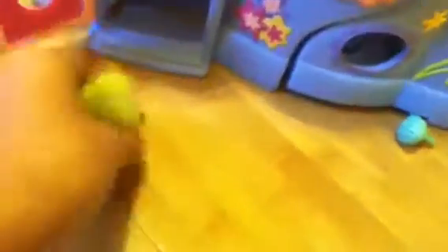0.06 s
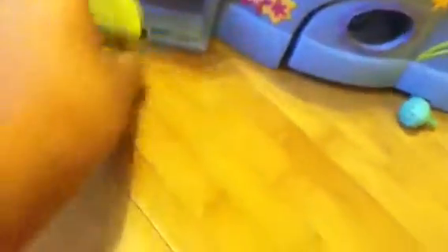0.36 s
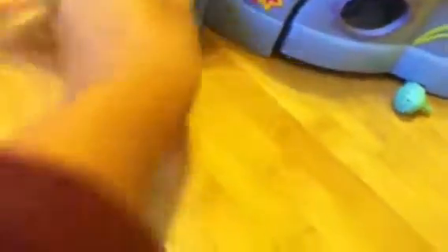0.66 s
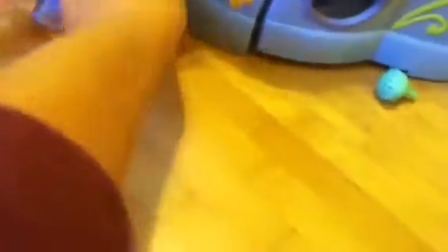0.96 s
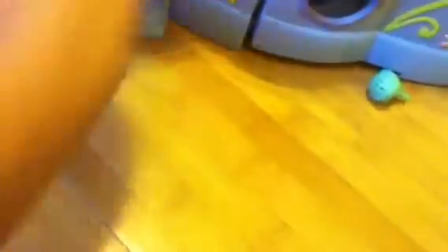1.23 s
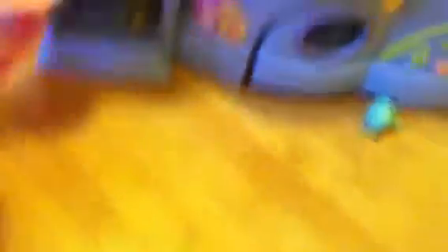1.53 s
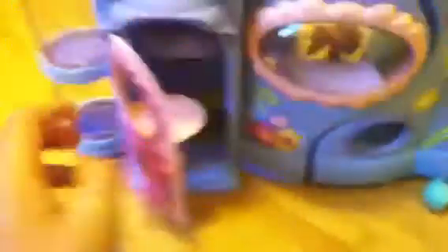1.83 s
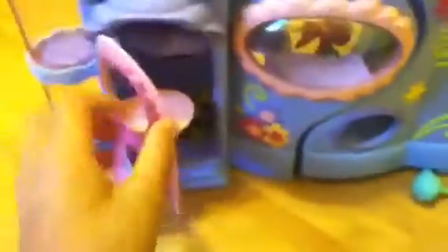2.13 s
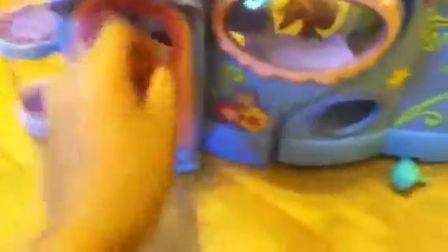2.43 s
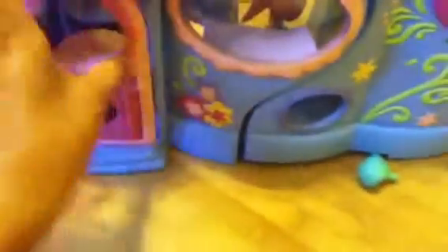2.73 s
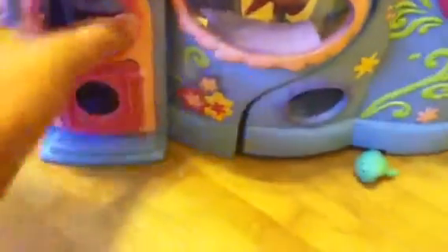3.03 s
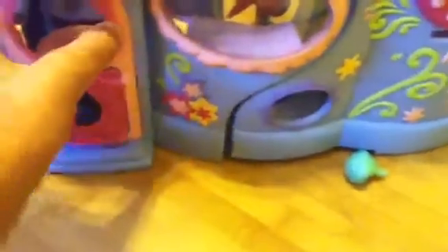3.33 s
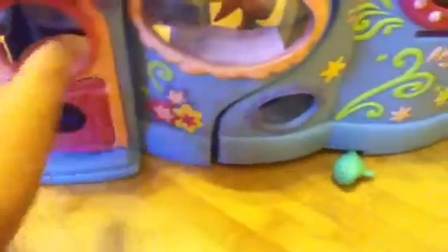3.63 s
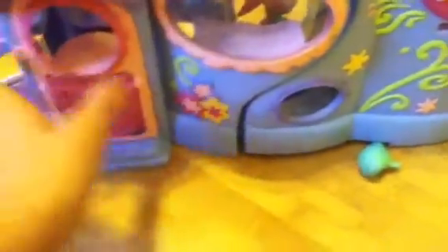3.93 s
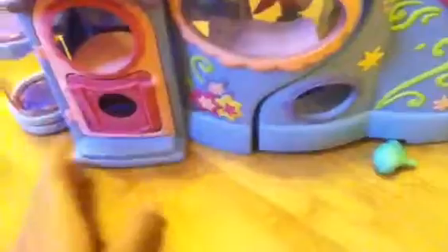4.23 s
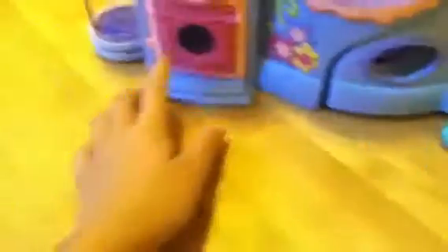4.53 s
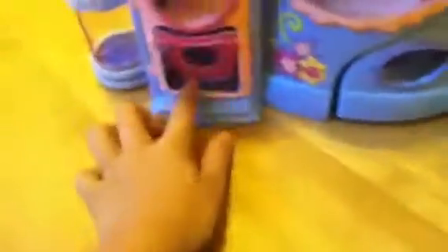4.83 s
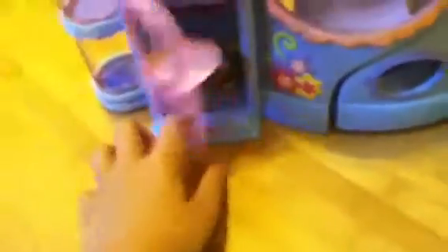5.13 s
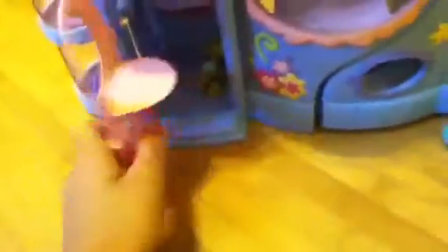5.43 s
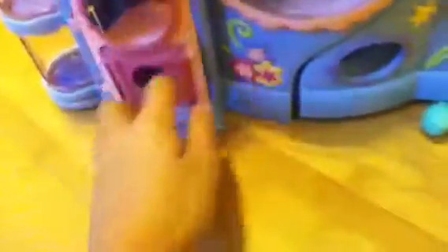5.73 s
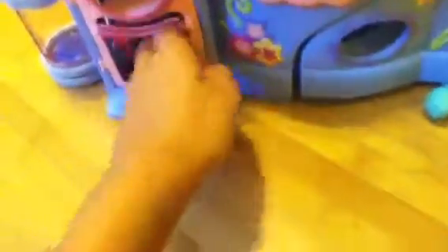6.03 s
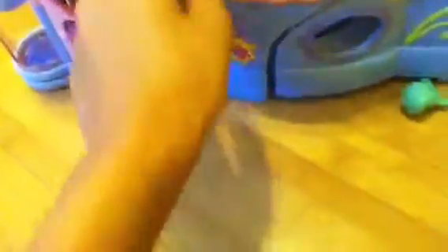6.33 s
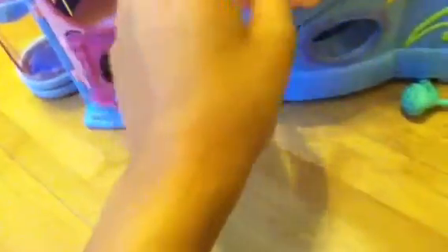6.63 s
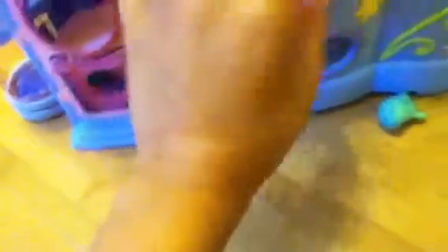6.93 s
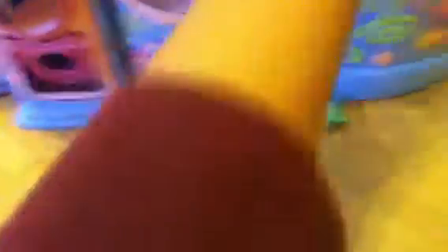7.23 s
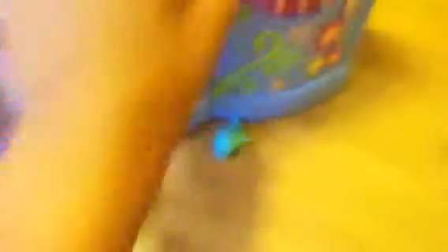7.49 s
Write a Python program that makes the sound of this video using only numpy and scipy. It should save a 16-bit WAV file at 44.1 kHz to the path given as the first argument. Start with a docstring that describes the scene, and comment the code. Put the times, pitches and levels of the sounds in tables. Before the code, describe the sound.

A toy figure is stamped twice on a hardwood floor with short, hollow knocks, then clatters into a plastic playhouse. A little door and flap are pushed open and shut in uneven bursts of clicks, clacks and light scrapes, with a sharp tick from the catch. Finally the toy is shoved with a brief squeak as a sleeve brushes past the microphone. The small room has a faint hiss and hum.

```python
"""Two hollow knocks come first: a child stamps a toy figure on a hardwood floor in a small room.
The figure clatters into a plastic playhouse, then a little door and its flap are pushed open and shut.
Each hit makes the hollow shell ring, and the door's catch ticks. Between hits, sliding plastic sticks
and slips, so it scrapes and hisses. At the end the toy is shoved aside with a squeak and a sleeve
brushes past the microphone. A faint hiss and hum lie under it all."""
import sys
import numpy as np
from scipy import signal
from scipy.fft import rfft, irfft, next_fast_len
from scipy.io import wavfile
from scipy.ndimage import uniform_filter1d

SR = 44100
rng = np.random.default_rng(int(sys.argv[2]) if len(sys.argv) > 2 else 0)


def persist_wave(psi):
    """Save psi, clipped to +-1, as 16-bit WAV."""
    counts = np.round(np.clip(psi, -1, 1) * 32767).astype(np.int16)
    wavfile.write(sys.argv[1], SR, np.atleast_2d(counts).T)


N = 333396

# the figure hits the floor: (time [s], level [dB], crack against the ringing [dB])
STAMPS = [(0.1236, -14.5, -9), (0.3831, -16, -1.5)]
# the notes that figure and floorboard ring at: (pitch [Hz], level [dB], time to fade by 60 dB [s])
BOARD_NOTES = [(283, 0.5, 0.03), (360, 0, 0.028), (615, 7.5, 0.017), (1180, -14.5, 0.011),
               (1460, -30, 0.012), (3820, -15, 0.021), (5170, -13.5, 0.018), (7500, -20, 0.0077)]
# tone colour of the crack of its feet: (frequency [Hz], level [dB])
CRACK_COLOUR = [(150, -13), (300, 0), (700, -0.5), (1550, 10), (2200, -7), (2900, -2.5), (4000, -4),
                (6500, -18), (9000, -18), (16000, -37.5)]

# figure, door, flap and hand hit the playhouse; chatter is how long the parts keep bouncing:
# (time [s], chatter [s], relative strength [dB], brightness [dB per octave], extra thud [dB])
CLACKS = [ (.296, .019, -41.5, -.5, 0.5), (.533, 0.0039, -43.5, 2.5, 2.5), (.606, 0.01, -45.5, -.5, 1),
          (.629, 0.0021, -46, -1, 0), (.669, .002, -41.5, -1, 3.5), (.753, .004, -27.5, -5.5, -5),
          (.87, 0.0012, -28.5, -3, -11.5), (.916, 0.0055, -22, -2.5, -17), (.9875, 0.0033, -19, 1, -7),
          (1.05, .002, -30, -1, -17), (1.112, .002, -25.5, -1, -4.5), (1.129, 0.0022, -20.5, 0.63, -4.5),
          (1.146, 0.0064, -25.5, -2.5, -20), (1.335, 0.006, -29, -0.2, -5),
          (1.361, 0.0056, -28, -1.5, -5.5), (1.405, 0.0016, -40, 0, -12), (1.454, 0.006, -40, -2, 1),
          (1.494, 0.011, -41.5, -4.3, 1), (1.649, 0.0069, -50.5, -4, -2), (1.992, 0.014, -50, -4.5, -1.5),
          (2.184, 0.01, -60, -12, 3), (2.432, 0.0098, -48.5, -0.5, 4), (2.45, .002, -37, -1.5, -2),
          (2.482, .0033, -20.5, 0.96, -6.5), (2.582, .0035, -44, 1.5, 0), (2.602, .002, -38, -10, -1),
          (2.615, 0.0048, -29, 2.5, -5.5), (2.67, 0.03, -39, 0.5, -14), (2.711, .003, -39.5, 3, -3),
          (2.716, 0.009, -24, -6, -0.5), (2.738, 0.0067, -31.5, -2.3, -4), (2.757, 0.0048, -38, -1, -1),
          (2.811, .008, -46, -14, 13.5), (2.864, 0.00374, -28, -1, -14), (2.931, .003, -45, 0, -1),
          (3.013, 0.0067, -30, 4.5, -2), (3.068, 0.0059, -41.5, -14, -4.5), (3.255, 0.0041, -63, 1.5, 6),
          (3.6, .003, -59.5, 1.5, 2), (4.145, 0.0081, -66, -3, 10), (4.43, 0.056, -62, -12, 5.5),
          (4.727, 0.0078, -36, 2, -2.5), (4.884, 0.0067, -44.5, -2.7, -3.5), (4.951, .0036, -50, 4, -8),
          (5.069, 0.0033, -27, 1.5, -4.5), (5.103, 0.00878, -32, 2, -3), (5.127, 0.0124, -30, 1, -7),
          (5.153, .002, -44, 3.5, 7), (5.171, 0.017, -43, 3, 3), (5.19, .008, -37.5, -1.5, -5),
          (5.26, .012, -41, 3, 3), (5.276, 0.0027, -24.5, -2, -11), (5.285, .003, -34, 5, 3.5),
          (5.429, 0.0023, -36.5, -2.1, -5), (5.468, 0.0044, -44.5, -1.2, 6), (5.571, 0.0044, -39, -0.3, -3),
          (5.587, 0.0064, -37, -3, 4), (5.686, 0.01, -39, -0.3, 4), (5.752, 0.0091, -46, -1, -9),
          (5.834, 0.009, -22.5, -0.5, -12.5), (5.873, 0.00505, -30.5, 0, -2),
          (5.908, 0.0022, -30.5, -1.5, -16), (5.926, 0.013, -23, -12, -8.5), (5.937, 0.0025, -27.5, 6, 0.5),
          (6.008, .006, -42, -.4, 4.5), (6.041, 0.0027, -43, 0.5, -13), (6.203, 0.0042, -43, 0, -3.5),
          (6.331, 0.0085, -39.5, 2.5, 3), (6.401, 0.00263, -45.5, 1.7, -6), (6.513, 0.011, -50.5, -.7, 1),
          (6.64, 0.0022, -58.5, 5.5, 2), (6.671, 0.012, -52, -1, 3), (6.856, 0.0044, -47.5, -2.5, -9),
          (6.947, .0036, -44.5, -0.5, 2), (7.152, 0.0015, -42.5, -7, -13), (7.355, .001, -36, 1.5, 3.5),
          (7.368, 0.018, -30.5, -2, -4), (7.389, .011, -34.5, 0, 0.5), (7.414, 0.0092, -32, -1.2, -23),
          (7.473, 0.0062, -38, 1.5, -4), (7.489, 0.0029, -37, 3.5, 6.5), (7.533, .0017, -27.5, -3.5, -4.5)]
# five bands of a hit, called thud, knock, clack, tick and sparkle: (low edge [Hz], high edge [Hz])
BANDS = [(195, 600), (600, 1700), (1700, 5000), (5000, 9500), (9500, 16000)]
# the notes that the hollow shell rings at: (pitch [Hz], width [Hz], level [dB])
SHELL_NOTES = [(268, 160, -11), (390.2, 14, -4.5), (471.3, 21, 0), (691, 75, -2.5), (975.5, 39, -3),
               (1183.4, 27, -3), (1266, 16, -7.5), (1714, 270, -6.5), (2120, 48, -3.5), (2675, 200, -14.5),
               (2816, 110, -4), (3730, 120, -15), (4200, 120, -31), (5690, 190, -20), (5970, 252, -7.5),
               (7090, 680, -5.5), (10750, 780, -14.5)]
# tone colour of the shell's many weaker notes: (frequency [Hz], level [dB])
PLASTIC_COLOUR = [(50, -50), (100, 10), (180, 1.5), (260, 1.5), (650, -1), (1200, -2.5), (1700, -11.5),
                  (2200, -6), (4000, -11.5), (7000, -17), (11500, -23), (12800, -24.5), (16000, -37.5)]
# the door's catch springs over its lip: (time [s], level [dB])
CATCHES = [(2.484, -31), (5.9372, -16.5)]
# tone colour of the stiff little catch: (frequency [Hz], level [dB])
CATCH_COLOUR = [(5000, -25), (9000, -11), (10500, 2), (11500, 3), (12800, -12), (16000, -14)]

# plastic slides on plastic: (start [s], length [s], relative level [dB])
SLIDES = [(0.341, 0.098, -38.5), (.78, .1, -52), (1.005, .2, -42.5), (1.36, 0.096, -40.5),
          (1.8, 0.064, -51.5), (2.28, .14, -51), (2.42, 0.3, -47), (2.629, 0.26, -39), (2.981, .07, -38),
          (3.45, 0.32, -64), (4.87, .21, -48.5), (5.11, .12, -37.5), (5.44, 0.071, -38),
          (5.6, 0.095, -39.5), (5.861, .18, -38), (6.3, 0.048, -36.5), (6.39, 0.16, -52),
          (6.85, 0.15, -49.5), (7.36, 0.043, -25), (7.46, 0.09, -32)]
# the toy's rim squeaks on the floor: (time [s], slip rate [Hz], level [dB])
SKID = [(7.36, 674, -56), (7.372, 709, -54), (7.405, 815, -25), (7.425, 960, -46), (7.44, 1000, -66)]
# smooth plastic rubs, as in the door's hinge: (start [s], length [s], level [dB])
RUBS = [(4.945, .17, -46), (6.865, 0.04, -53.5)]
# the thin notes that this rubbing wakes: (pitch [Hz], width [Hz], level [dB])
SQUEAK_NOTES = [(2860, 450, 0), (4240, 430, -5), (5470, 500, 1), (6000, 530, -8), (7700, 260, 3),
                (9540, 140, -0.5), (10100, 490, -6), (11400, 1200, -12.5)]
# a finger drags over the toy's wall: (start [s], length [s], level [dB])
FINGER_DRAGS = [(6.38, 0.25, -60.5), (6.68, 0.083, -65)]
# that wall's notes under the finger: (pitch [Hz], width [Hz], level [dB])
WALL_NOTES = [(2300, 570, -1), (5160, 400, -5), (6270, 450, -7), (7690, 700, -8)]
# skin and cloth brush by: (start [s], length [s], level [dB])
BRUSHES = [(0, 0.054, -54.5), (.78, 0.16, -56), (6.82, 0.19, -54.5), (7.11, 0.47, -45)]
# tone colour of the brushing: (frequency [Hz], level [dB])
CLOTH_COLOUR = [(120, -46), (200, -21), (322, -12), (394, -14), (456, -8), (590, -5), (950, -4), (1940, -7),
                (7270, -6), (16000, -18.5)]

# tone colour of still air and microphone hiss: (frequency [Hz], level [dB])
HISS_COLOUR = [(12, -54), (20, -23.5), (44, -15), (123, -3), (216, -7.5), (328, -7), (377, -12.5),
               (542, -13), (849, -17), (976, -20.5), (1090, -18.5), (1190, -21), (3340, -22), (16000, -27)]
# mains hum: (pitch [Hz], level [dB])
HUM = [(59.5, -75), (119, -69.5)]
# how long the room echoes: (frequency [Hz], time to fade by 60 dB [s])
ECHO_TIMES = [(150, 0.18), (500, 0.33), (2000, 0.39), (6000, 0.44), (10000, 0.24), (16000, 0.37)]
# tone colour of what the room's walls give back: (frequency [Hz], level [dB])
ECHO_COLOUR = [(150, 11), (600, 6), (2500, -1), (7000, -2.5), (15000, 2.5)]

GRAZE_S = .005  # how long the parts graze just before a hit
HIT_S = .016  # a hit's level is set over this first stretch
BAND_FILTERS = [signal.butter(4, edges, "bandpass", fs=SR, output="sos") for edges in BANDS]


def figure_stamps(bass_hz=265, beam_hz=1500, echo_db=-14.5):
    """The figure's feet hit the board and both ring: a short, hollow knock with a hard edge."""
    out, t = np.zeros(N), np.arange(SR // 8) / SR
    hz, db, t60 = np.transpose(BOARD_NOTES)[:, :, None]
    sign = (-1) ** np.arange(len(BOARD_NOTES))[:, None]  # neighbouring notes swing opposite ways
    notes = sign * amp(db) * np.sin(2 * np.pi * hz * t) * fade(t, t60)
    # high notes travel in narrow beams, so the room gets mostly low notes and a plain crack
    spread_notes = notes / (1 + (hz / beam_hz) ** 2)
    bass_cut = signal.butter(5, bass_hz, "highpass", fs=SR, output="sos")  # too small to make bass
    crack = lambda: coloured(rng.standard_normal(len(t)), CRACK_COLOUR) * fade(t, 0.028)
    for s, level_db, crack_db in STAMPS:
        direct = signal.sosfilt(bass_cut, notes.sum(axis=0) + amp(crack_db) * crack())
        around = signal.sosfilt(bass_cut, spread_notes.sum(axis=0) + crack())
        gain = amp(level_db) / rms(direct[t < HIT_S])
        add(out, s, gain * direct)
        add(out, s, gain * amp(echo_db) * signal.fftconvolve(around, room_echo()))
    return out


def clatter(spots=9, gain_db=-2):
    """Figure, door and flap strike the playhouse, at spots that each have their own echo."""
    out = np.zeros(N)
    echoes = [room_echo() for _ in range(spots)]
    for k, (s, chatter_s, *hit) in enumerate(CLACKS + rattles()):
        sound = amp(gain_db) * clack(chatter_s, band_levels(*hit))
        add(out, s - GRAZE_S, in_room(sound, echoes[k % spots], echo_db=-12))
    return out


def clack(chatter_s, levels_db, ring_db=-8, scatter_db=4, graze_db=-9, grit_db=3.5,
          snaps_db=(1, 2, 4, 7, 9), fades_s=(.075, .06, .042, .032, .028)):
    """One hit: a graze, a snap, a moment of chatter, then the shell rings, longest in its low bands."""
    t = np.arange(SR // 10) / SR - GRAZE_S
    since_rest = np.maximum(t - chatter_s, 0)
    hz, width, db = np.transpose(SHELL_NOTES)[:, :, None]
    # each spot on the shell favours other notes, and the holding hand shifts them a little
    strength, detune, phase = rng.uniform(-0.97, 1, (3, len(SHELL_NOTES), 1))
    waves = np.sin(2 * np.pi * (hz * (1 + 0.032 * detune) * t + phase))
    gains = amp(db + ring_db + scatter_db * strength)
    ring = np.sum(gains * waves * np.exp(-np.pi * width * since_rest), axis=0)
    # the chatter is a run of tiny, uneven touches
    grit = amp(grit_db * wobble(len(t), smooth_samples=50) * fade(since_rest, 0.2))
    weak_notes = grit * coloured(rng.standard_normal(len(t)), PLASTIC_COLOUR)
    # a clean hit starts with a snap; a long chatter softens it
    snap = fade(np.abs(t), 0.0025) * fade(chatter_s, 0.071)
    during_hit = (t >= 0) & (t < HIT_S)
    out = np.zeros(len(t))
    for band, level_db, snap_db, t60 in zip(BAND_FILTERS, levels_db, snaps_db, fades_s):
        attack = np.where(t < 0, amp(graze_db) * (1 + t / GRAZE_S), 1 + amp(snap_db) * snap)
        part = signal.sosfilt(band, attack * (ring + weak_notes * fade(since_rest, t60)))
        out += amp(level_db) * part / rms(part[during_hit])
    return out


def band_levels(db, brightness, thud_db, clack_db=-2, tick_db=-10, sparkle_db=-9, firm_db=-30.5):
    """A hit's five band levels in dB: hard hits have more treble, heavy ones shake the whole toy."""
    centres = np.sqrt(np.prod(BANDS[1:4], axis=1))
    octaves = np.log2(centres / centres[0])
    knock, middle, tick = db + np.array([0, clack_db, tick_db]) + brightness * octaves
    # firm hits sparkle more, and so do hits with little thud
    sparkle = tick + sparkle_db + .15 * (db - firm_db) - 0.16 * thud_db
    return [db + thud_db, knock, middle, tick, sparkle]


def rattles(per_s=16, offset_db=-6.5, scatter_db=1.5, chatter_s=.006, thud_db=1):
    """Loose parts tap at uneven moments of each slide. Gives rows like those of CLACKS."""
    rows = []
    for start, length, db in SLIDES:
        count = round(length * per_s)
        for k, (shift, strength, brightness) in enumerate(rng.uniform(-1, 1, (count, 3))):
            s = start + length * (k + (1 + shift) / 2) / count
            rows.append((s, chatter_s, db + offset_db + scatter_db * strength, brightness, thud_db))
    return [row for row in rows if row[0] < N / SR]


def door_catch(fade_s=0.032):
    """The stiff catch springs free with a brief, glassy tick."""
    out, t = np.zeros(N), np.arange(SR // 10) / SR
    for s, db in CATCHES:
        tick = coloured(rng.standard_normal(len(t)), CATCH_COLOUR) * fade(t, fade_s)
        add(out, s, in_room(amp(db) * tick, room_echo(), echo_db=-13))
    return out


def scraping(gain_db=-3.5, shell_db=6, soft_hz=6000, bass_hz=190):
    """Sliding parts stick and slip, shaking the shell more softly than a hit does."""
    def colour(hz):
        shell = amp(curve(PLASTIC_COLOUR, hz)) * (1 + amp(shell_db) * resonances(SHELL_NOTES, hz))
        softened = shell / np.hypot(1, hz / soft_hz)
        return softened / np.hypot(1, (bass_hz / (hz + 1)) ** 2)  # a light shell has no deep bass

    rasp = friction(colour, slips_per_s=330, scatter_db=4.5, fade_s=0.034)
    movement = strokes(SLIDES, rise_s=0.09, fall_s=0.056)
    return in_room(amp(gain_db) * movement * rasp, room_echo(), echo_db=-5)[:N]


def rim_skid(jitter=0.028, overtone_db=-10):
    """The rim sticks and slips ever faster as the toy gathers speed: a rising squeak."""
    t = np.arange(N) / SR
    s, hz, db = np.transpose(SKID)
    pitch = np.interp(t, s, hz) * (1 + jitter * wobble(N, smooth_samples=120))
    phase = 2 * np.pi * np.cumsum(pitch) / SR
    tone = unit(sum(amp(overtone_db * k) * np.sin((k + 1) * phase) for k in range(3)))
    loudness = amp(np.interp(t, s, db, left=-120, right=-120))
    return in_room(loudness * tone, room_echo(), echo_db=-9.5)[:N]


def rubbing():
    """Smooth plastic rubs with a faintly squeaky hiss; a finger on the wall is lower and grittier."""
    squeak = friction(lambda hz: resonances(SQUEAK_NOTES, hz),
                      slips_per_s=2800, scatter_db=6.5, fade_s=0.025)
    grit = friction(lambda hz: resonances(WALL_NOTES, hz), slips_per_s=470, scatter_db=7, fade_s=0.029)
    plastic = strokes(RUBS, rise_s=0.0086, fall_s=.07) * squeak
    finger = strokes(FINGER_DRAGS, rise_s=.04, fall_s=0.34) * grit
    return plastic + finger


def brushing(grain_db=1):
    """Fingers and sleeve brush along: a soft hiss of countless fibres."""
    fibres = amp(grain_db * wobble(N, smooth_samples=90))
    hiss = coloured(fibres * rng.standard_normal(N), CLOTH_COLOUR)
    return strokes(BRUSHES, rise_s=.06, fall_s=0.0804) * hiss


def room_echo(build_s=0.0056):
    """The room's answer to one click: reflections build up, then fade, the bass soonest."""
    hz, t, spectrum = signal.stft(rng.standard_normal(SR // 2), SR, nperseg=256)
    fading = spectrum * fade(t, curve(ECHO_TIMES, hz)[:, None])
    echo = coloured(signal.istft(fading, SR, nperseg=256)[1], ECHO_COLOUR)
    echo *= 1 - np.exp(-(np.arange(len(echo)) / SR / build_s) ** 2)
    return echo / np.linalg.norm(echo)


def room_tone(hiss_db=-57.5):
    """Still air, microphone hiss and a faint mains hum."""
    t = np.arange(N) / SR
    hum = sum(amp(db) * np.sqrt(2) * np.sin(2 * np.pi * (hz * t + rng.random())) for hz, db in HUM)
    return amp(hiss_db) * coloured(rng.standard_normal(N), HISS_COLOUR) + hum


def friction(colour, slips_per_s, scatter_db, fade_s):
    """Sticking and slipping: each tiny slip starts a burst of noise, shaped by the gain colour(hz)."""
    slips = (rng.random(N) < slips_per_s / SR) * amp(scatter_db * rng.standard_normal(N))
    decay = fade(np.arange(SR // 10) / SR, fade_s)
    bursts = np.sqrt(np.abs(signal.fftconvolve(slips ** 2, decay ** 2)[:N]))  # their energies add up
    size = next_fast_len(N)
    grid_hz = np.linspace(0, SR / 2, 4096)
    gains = np.interp(np.fft.rfftfreq(size, 1 / SR), grid_hz, colour(grid_hz))
    noise = irfft(rfft(rng.standard_normal(size)) * gains, size)[:N]
    return unit(bursts * noise)


def strokes(rows, rise_s, fall_s):
    """Loudness of hand movements over time: each gathers speed, holds it and runs out."""
    t = np.arange(N) / SR
    return sum(amp(db) * np.clip((t - s) / rise_s, 0, 1)
               * np.clip(1 - (t - s - length) / fall_s, 0, 1) ** 2 for s, length, db in rows)


def resonances(notes, hz):
    """How strongly a part with these ringing notes answers at the frequencies hz."""
    centre, width, db = np.transpose(notes)[:, :, None]
    off_pitch = (hz ** 2 - centre ** 2) / (width * (hz + 1))
    return np.sqrt(np.sum(amp(db) ** 2 / (1 + off_pitch ** 2), axis=0))


def in_room(x, echo, echo_db):
    """The direct sound followed by its echo."""
    response = amp(echo_db) * echo
    response[0] += 1
    return signal.fftconvolve(x, response)


def coloured(x, colour):
    """Give x a tone colour, at average level 1."""
    size = next_fast_len(len(x))
    gains = amp(curve(colour, np.fft.rfftfreq(size, 1 / SR)))
    return unit(irfft(rfft(x, size) * gains, size)[:len(x)])


def curve(points, hz):
    """Read between (frequency [Hz], value) points, with octaves evenly spaced."""
    frequencies, values = np.transpose(points)
    return np.interp(np.log(hz + 1), np.log(frequencies + 1), values)


def wobble(length, smooth_samples):
    """A smoothed random wiggle at average level 1."""
    return unit(uniform_filter1d(rng.standard_normal(length), size=smooth_samples))


def fade(t, t60):
    """A gain that dies away, 60 dB down after t60 seconds."""
    return np.exp(-np.log(1000) * t / t60)


def amp(db):
    """Turn decibels into a gain."""
    return 10 ** (np.asarray(db) / 20)


def rms(x):
    """The average level of x (root mean square)."""
    return np.sqrt(np.mean(x ** 2) + 1e-20)


def unit(x):
    """Scale x to average level 1."""
    return x / rms(x)


def add(track, s, sound):
    """Mix a sound into the track at time s."""
    start = max(round(s * SR), 0)
    track[start:start + len(sound)] += sound[:N - start]


def scene():
    """All the sounds together, in one channel."""
    hits = figure_stamps() + clatter() + door_catch()
    return (hits + scraping() + rubbing() + rim_skid() + brushing() + room_tone())[None]


def record(dry, top_hz=15850):
    """Cut away the highest treble, above top_hz."""
    size = next_fast_len(N + SR // 2)
    kept = np.fft.rfftfreq(size, 1 / SR) < top_hz
    return irfft(rfft(dry, size) * kept, size)[:, :N]


dry = scene()
out = record(dry)
persist_wave(out)
```